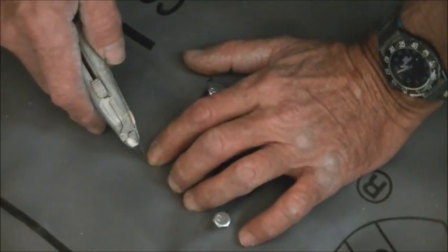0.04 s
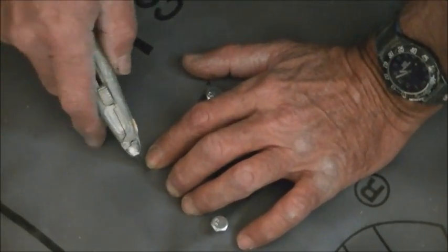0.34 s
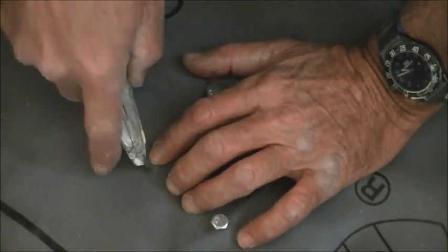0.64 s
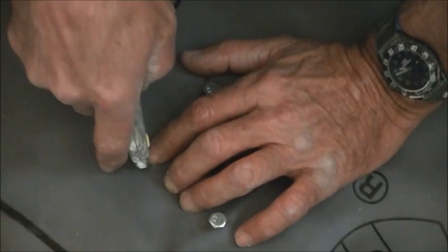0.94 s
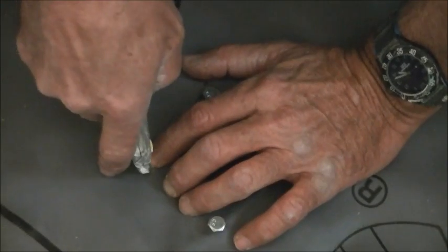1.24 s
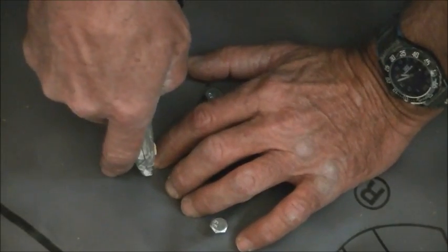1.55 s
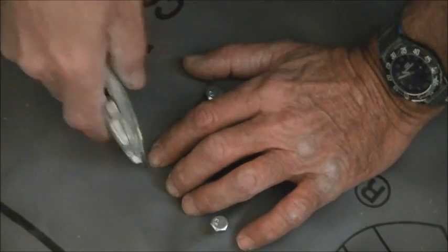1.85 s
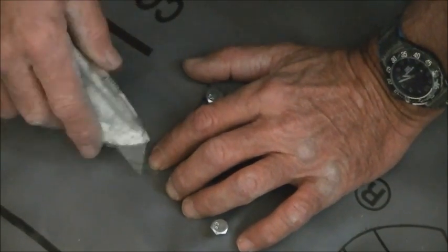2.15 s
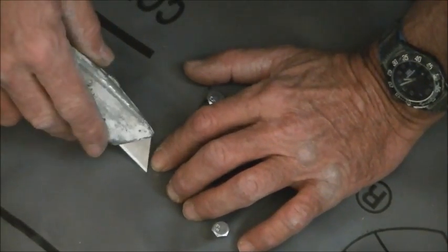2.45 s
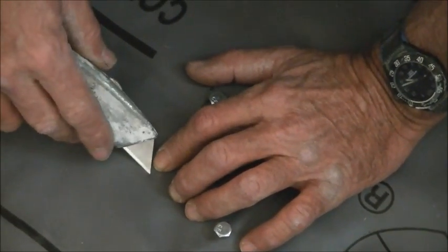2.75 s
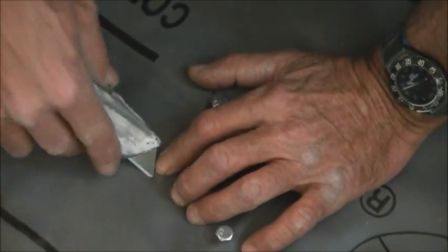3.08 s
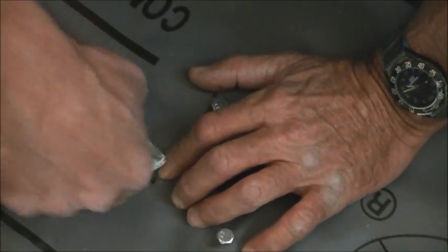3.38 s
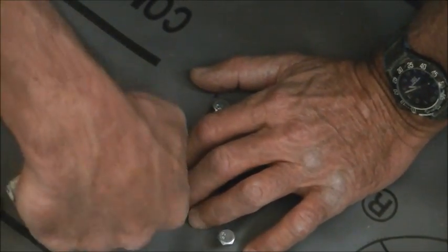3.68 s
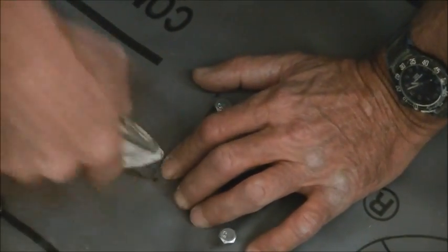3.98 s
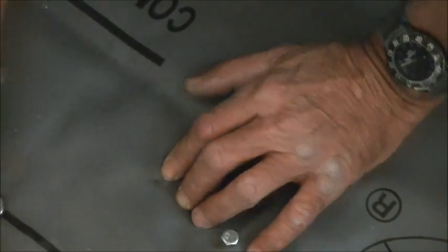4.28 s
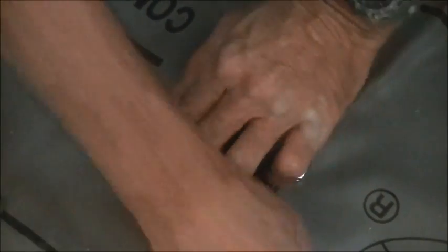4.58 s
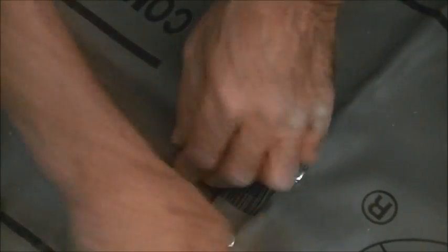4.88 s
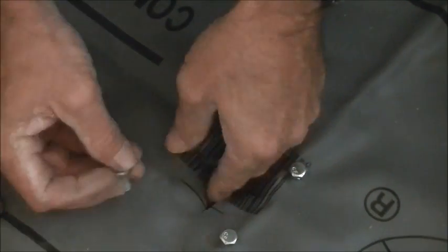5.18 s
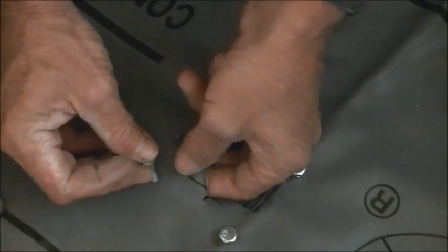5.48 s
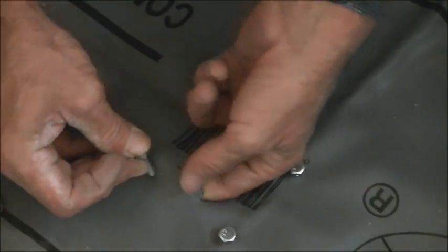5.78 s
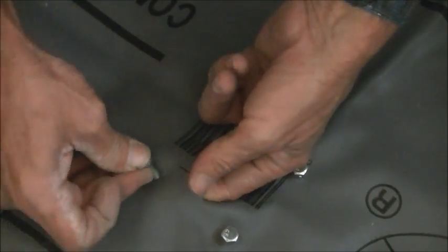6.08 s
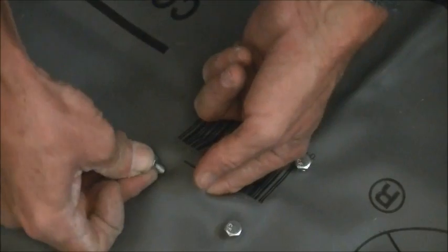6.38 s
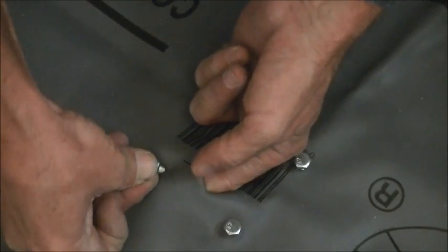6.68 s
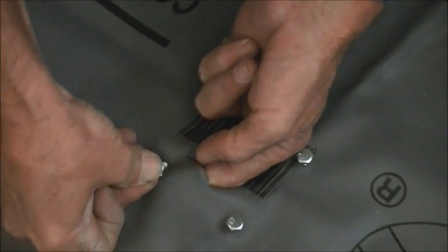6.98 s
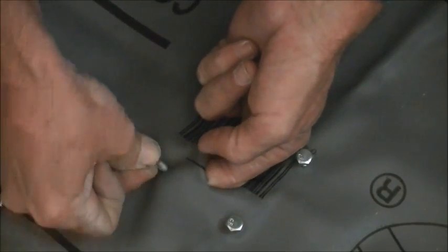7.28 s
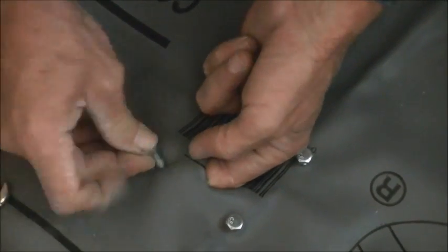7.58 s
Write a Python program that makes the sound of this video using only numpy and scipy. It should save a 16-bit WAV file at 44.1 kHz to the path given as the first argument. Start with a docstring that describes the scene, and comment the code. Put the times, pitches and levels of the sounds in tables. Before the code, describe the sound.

Heard close up in a small bathroom, scattered bright metal clicks and faint squeaks come from a utility knife being worked against a plastic liner. The loose blade chatters, then the knife hits the covered floor with one loud, low thud and settles. Hollow finger pats and hissing hand strokes over the plastic follow, with a few tiny bolt ticks and a soft knock. Low room noise and mains hum continue underneath.

```python
"""A metal utility knife, heard close up in a small bathroom, pricks a plastic floor liner.
Its blade slides out and rattles in the handle in bright, ringing clicks. The knife is then set down
hard: the covered floor thuds and booms, and the knife rocks to rest. Hands pat the liner, sweep it
with a hiss of tiny slips and fiddle with a bolt, over a quiet bed of room air and mains hum."""
import sys
import numpy as np
from scipy import signal
from scipy.fft import rfft
from scipy.io import wavfile
from scipy.ndimage import uniform_filter1d

SR = 44100
rng = np.random.default_rng(int(sys.argv[2]) if len(sys.argv) > 2 else 0)


def materialize(psi):
    """Save the field psi as 16-bit PCM at rate SR to the path in sys.argv[1].

    A 1-D psi becomes a single channel; in a 2-D psi each row is a channel.
    """
    bounded = np.clip(np.atleast_2d(psi).T, -1, 1)
    quanta = np.round(bounded * 32767).astype(np.int16)
    wavfile.write(sys.argv[1], SR, quanta)


N = 345611
HIT_TIME = np.arange(SR) / SR  # seconds since a hit
LANDING_S, TICK_T60_S = 4.388, .04  # when the knife lands; how fast its light ticks die

# Clicks of knife and bolt. Each row: start in seconds, level in dB, rattle t60 in seconds,
# midrange knock in dB, top-end edge in dB, handle resonance in Hz.
CLICKS = [(0.0607, -58, .05, 19, -3, 2730), (1.047, -51.5, 0.027, 12.5, -16, 1980),
          (1.744, -38, 0.031, 6, 1.5, 1940), (1.888, -49, 0.024, 15, 10, 2250),
          (1.8932, -37, 0.028, 0, 1, 1570), (1.991, -52.5, .02, 16, 6, 1510),
          (2.105, -60.5, .045, 17, 5, 1790), (2.1958, -52, .035, -2, 2, 3360),
          (2.46, -55, .04, 3.5, -11, 1920), (2.5761, -51, 0.11, 1.5, -4, 2440),
          (2.6613, -50.5, 0.028, 2.5, -7, 3300), (2.912, -51.5, 0.08, 4, -3, 3220),
          (2.9506, -43.5, .04, -4, 9, 2200), (3.2894, -57.5, .12, 9, -1, 1500),
          (3.3842, -53, 0.038, 13, 3, 3000), (3.9393, -53, .037, 22, -1, 1940),
          (3.966, -54, .066, 7, 3, 2730), (4.0096, -50.5, 0.08, 7, -1, 3240),
          (4.042, -44, 0.049, 7, 1, 3140), (4.0996, -54.5, .03, 13, -12, 4570),
          (4.3579, -45, 0.049, 17, -7, 1090), (4.3881, -26, 0.015, 8.5, 0, 3120),
          (4.5737, -48, .1, 6, -20, 2280), (5.379, -51.5, .06, -6, 7, 10500),
          (5.9676, -50, 0.036, 18, -24, 1630), (7.078, -57.5, 0.043, 26, -5, 1700)]
# The tone of a metal click. Each row: frequency in Hz, gain in dB.
METAL_EQ = [(60, -29), (150, 0), (400, -14), (1000, -1.5), (1450, -1.5), (3000, -2), (4400, 1), (8000, 1),
            (10000, -1), (13000, -4), (15500, -13)]
# The ring of the knife. Each row: pitch in Hz, relative level in dB, t60 in seconds.
KNIFE_MODES = [(1456, -23.5, 0.1), (1660, -28, 0.066), (2323, 7, 0.074), (3500, -12, 0.035),
               (4170, -2, 0.097), (4930, 9, 0.014), (5200, 18, .035), (6700, 3, 0.049), (7500, -4, 0.033),
               (7800, -15, .035), (8840, 11, 0.033), (9800, 1, 0.043), (10560, -18, .03), (13200, -13, .03)]
# Squeaks of blade, grip and liner. Each row: start and length in seconds, level in dB, pitch in Hz.
SQUEAKS = [(0.055, 0.11, -67, 2770), (1.199, 0.045, -57, 257), (1.892, 0.031, -53, 1520),
           (2.162, 0.19, -68.5, 2630), (3.65, 0.19, -71, 3400), (3.97, 0.1, -63, 3430),
           (4.16, 0.084, -63, 860), (4.507, 0.12, -55.5, 2310), (4.7, 0.034, -45.5, 1030),
           (6.269, 0.14, -65.5, 324)]
# Blows on the covered floor. Each row: start in seconds, level in dB, contact cut-off in Hz.
THUDS = [(1.7445, -51, 700), (3.465, -56.5, 800), (4.046, -54, 150), (4.368, -43, 650),
         (4.387, -27.5, 11000), (4.3884, -18, 2500), (4.3911, -25.5, 1190), (5.969, -54, 1000),
         (7.367, -48, 1000), (7.378, -46.5, 800)]
# The tone of a blow. Each row: frequency in Hz, gain in dB.
BLOW_EQ = [(30, -43), (60, -36), (120, -3.5), (195, 3), (290, 3.5), (480, -6.5), (750, -3.5), (1150, -2.5),
           (1450, -22), (1900, -11), (3100, -33), (4400, -12), (7000, -16), (15500, -31)]
# The ring of the floor. Each row: pitch in Hz, relative level in dB, t60 in seconds.
FLOOR_MODES = [(77, -11, 0.95), (184, -29, 0.31), (239.4, 4, 0.42), (276, -2, 0.045), (320, -11, 0.2),
               (421, 7, 0.27), (521, 6.5, .35), (583, 2.5, 0.2), (653, -14, 0.36), (670, -19, 0.32),
               (766, -8, 0.25), (940, -13, 0.46), (1050, -11, 0.451), (1170, -10, .22), (1210, -14, .2),
               (2255, 3, 0.33), (2800, -18, .3), (3277, -20, 0.31), (3655, -14, .3)]
# Finger pats. Each row: start in seconds, level in dB, treble slap in dB, t60 in seconds.
PATS = [(4.711, -45.5, 11, 0.03), (4.967, -45.5, -4, 0.12), (5.174, -47.5, -15.5, 0.041),
        (5.186, -39.5, 4, 0.084), (5.466, -48, -11, 0.072), (5.678, -54, 2, 0.02)]
# The hollow tone of a pat. Each row: frequency in Hz, gain in dB.
PAT_EQ = [(40, -29), (120, 0), (190, -12), (250, -8), (325, 14), (420, -5.5), (600, -11), (900, 1),
          (1300, -9), (1900, -5.5), (3500, -17), (8000, -18.5), (15500, -36)]
# Hand sweeps. Each row: loudest moment and length in seconds, level at that moment in dB.
STROKES = [(3.452, .26, -65), (4.198, 0.48, -58.5), (4.359, 0.082, -50.5), (4.519, .32, -53),
           (4.764, .36, -48), (5.211, 0.55, -52.5), (5.46, .36, -58.5), (5.654, .2, -55),
           (6.067, 0.21, -62), (6.772, 0.45, -59.5), (7.439, .2, -63), (7.599, .6, -61.5)]
# The tone of skin on plastic. Each row: frequency in Hz, gain in dB.
RUB_EQ = [(80, -39), (300, -5), (700, 1), (1100, -3.5), (2200, -1.5), (4000, -8.5), (7500, -7.5),
          (11000, -15), (15500, -25)]
# Soft, close bumps. Each row: start in seconds, level in dB.
BUMPS = [(.357, -48.5), (1.9916, -49), (7.3692, -51)]
# The dull tone of a bump. Each row: frequency in Hz, gain in dB.
BUMP_EQ = [(20, -19), (60, -2), (200, -2.5), (450, -10.5), (1000, -27), (3000, -32), (10000, -59)]
# The bassy tone of the flutter. Each row: frequency in Hz, gain in dB.
FLUTTER_EQ = [(25, -48), (55, 0.5), (100, 6.5), (160, 0), (260, -4), (400, -25), (900, -37.5)]
# The tone of the room air. Each row: frequency in Hz, gain in dB.
AIR_EQ = [(20, -50), (40, -23), (60, -3), (100, -7.5), (130, 0), (175, -3), (250, -3), (420, -7.5),
          (1300, -14.5), (2800, -15.5), (3900, -19.5), (7600, -21), (13800, -28), (15800, -31.5)]
# Mains hum. Each row: pitch in Hz, rms level in dB.
HUM = [(120, -75), (180, -69), (241, -71)]
# The bathroom's decay. Each row: frequency in Hz, t60 in seconds.
ROOM_T60 = [(100, 1), (300, 0.41), (1000, 0.35), (3000, 0.44), (8000, 0.37), (15000, 0.18)]
# Early wall echoes. Each row: delay in seconds, relative level in dB.
WALL_ECHOES = [(.0095, -20.5), (0.0184, -12), (0.022, -21), (.039, -20.5)]


def click(db, t60, knock_db, edge_db, handle_hz, modes_db=-13, rise_s=.00079):
    """Steel snaps against the handle: a dense burst, resonances of grip and blade, and the knife's ring."""
    burst = colour(rattle(t60), METAL_EQ)
    blade_hz = 7700 - 45 * (db + 47)  # a harder knock moves more of the blade, which rings lower
    handle = amp(6) * resonate(burst, handle_hz, q=7)
    blade = amp(1) * resonate(burst, blade_hz, q=4)
    ringing = amp(modes_db) * struck(ring(KNIFE_MODES, spread_db=-8.5))
    snap = struck(burst + handle + blade) + ringing
    attack = 1 - np.exp(-HIT_TIME / rise_s)
    tilt = [(300, 0), (1500, knock_db), (3200, knock_db), (5500, 0), (9000, 0), (12000, edge_db)]
    return amp(db) * struck(colour(snap * attack, tilt))


def clicks():
    """The distinct clicks of slider, blade and bolt."""
    out = np.zeros(N)
    for start, *voicing in CLICKS:
        add(out, start, click(*voicing))
    return out


def chatter(start=3.653, count=6, first_db=-58, fall_db=2.5, gap_s=.065, hurry=1.15):
    """The loose blade chatters as the fist tightens: each thin tick comes sooner and softer."""
    out = np.zeros(N)
    for k in range(count):
        tick = click(first_db - fall_db * k, TICK_T60_S, knock_db=-17, edge_db=-2, handle_hz=3450)
        add(out, start, tick)
        start += gap_s / (k + 1) ** hurry
    return out


def ticks(count=7, db=-64, spread_db=7, spread_octaves=.25):
    """The knife ticks faintly at chance moments while it is in the hand."""
    out = np.zeros(N)
    for when, softness, grip in rng.uniform(-1, 1, (count, 3)):
        handle_hz = 2320 * 2 ** (spread_octaves * grip)
        tick = click(db - spread_db * softness, TICK_T60_S, knock_db=15, edge_db=2, handle_hz=handle_hz)
        add(out, LANDING_S * (when + 1) / 2, tick)
    return out


def squeaks(slips_per_s=900, q=5.9):
    """Blade, grip and liner squeak and rasp: stick-slip ticks keep one resonance sounding."""
    out = np.zeros(N)
    for start, length, db, hz in SQUEAKS:
        slips = rng.standard_normal(SR) * (rng.random(SR) < slips_per_s / SR)
        pressure = np.sqrt(np.sin(np.pi * np.minimum(HIT_TIME / length, 1)).clip(0))
        tone = resonate(resonate(slips, hz, q / 2), hz, q)
        add(out, start, amp(db) * pressure * unit(tone))
    return out


def thuds(clatter_db=-4, clatter_cut_hz=500, floor_db=-16, bloom_s=.0058):
    """A sharp push and a short clatter ring the floor; a softer contact loses treble."""
    out = np.zeros(N)
    low_cut = signal.butter(2, clatter_cut_hz, "high", fs=SR)
    bloom = 1 - np.exp(-HIT_TIME / bloom_s)
    for start, db, cut_hz in THUDS + rocks():
        t60 = .041 * .5 ** ((db + 54) / 10)  # every 10 dB harder halves the clatter's length
        clatter = signal.lfilter(*low_cut, rattle(t60))
        push = -struck(signal.unit_impulse(SR)) + amp(clatter_db) * struck(clatter)
        ringing = amp(floor_db) * struck(ring(FLOOR_MODES, spread_db=5)) * bloom
        blow = struck(colour(push, BLOW_EQ)) + ringing
        contact = signal.butter(2, cut_hz, fs=SR)
        add(out, start, amp(db) * struck(signal.lfilter(*contact, blow)))
    return out


def rocks(count=3, gap_s=.09, shrink=.82, first_db=-46, fall_db=4, cut_hz=600):
    """The knife rocks to rest: extra rows for THUDS, ever closer together and fading ever faster."""
    starts = LANDING_S + np.cumsum(gap_s * shrink ** np.arange(count))
    return [(start, first_db - fall_db * k ** 2, cut_hz) for k, start in enumerate(starts)]


def booms(floor_hz=142, swell_s=.021, thud_send_db=-10, rock_send_db=16, pat_send_db=-13):
    """Under every blow, rock and pat, a low floor mode swells and dies within a few cycles."""
    out = np.zeros(N)
    swell = (HIT_TIME / swell_s * np.exp(1 - HIT_TIME / swell_s)) ** 2
    boom = swell * np.sin(2 * np.pi * floor_hz * HIT_TIME)
    for touches, send_db in (THUDS, thud_send_db), (rocks(), rock_send_db), (PATS, pat_send_db):
        for start, db, *_ in touches:
            add(out, start, amp(db + send_db) * boom)
    return out


def pats(snap_db=-10):
    """Fingers press the liner onto the floor: a hollow puff with a plastic slap on top."""
    out = np.zeros(N)
    for start, db, slap_db, t60 in PATS:
        touch = struck(rattle(t60)) + amp(snap_db) * struck(signal.unit_impulse(SR))
        slap_shelf = [(400, 0), (1500, slap_db)]
        add(out, start, amp(db) * struck(colour(touch, PAT_EQ, slap_shelf)))
    return out


def strokes(slips_per_s=5000, rise_share=.47, ends_db=-16, touch_s=.012):
    """A hiss of tiny slips swells and fades as a hand slides over the plastic."""
    out = np.zeros(N)
    for peak_s, length, db in STROKES:
        rise_s = length * rise_share
        sizes = np.minimum(rng.exponential(1, SR), 5) * rng.standard_normal(SR)
        slips = sizes * (rng.random(SR) < slips_per_s / SR)
        squeak_db = 4 - .42 * (db + 57)  # light strokes squeak more near 1 kHz
        hiss = unit(colour(slips, RUB_EQ, [(600, 0), (1050, squeak_db), (2500, 0)]))
        speed = amp(np.interp(HIT_TIME, [0, rise_s, length], [ends_db, 0, ends_db]))
        touching = np.clip(np.minimum(HIT_TIME, length - HIT_TIME) / touch_s, 0, 1)
        add(out, peak_s - rise_s, amp(db) * hiss * speed * touching)
    return out


def bumps():
    """Single dull pushes, close and dry, with no ring."""
    out = np.zeros(N)
    bump = struck(colour(-signal.unit_impulse(SR), BUMP_EQ))
    for start, db in BUMPS:
        add(out, start, amp(db) * bump)
    return out


def flutter(rate_hz=30, jitter=.3, noise_db=-2, press_s=.31, lift_s=1.6, pressed_db=-61.5, rest_db=-81):
    """Uneven low pulses that swell while the knife tip is pressed in."""
    t = np.arange(N) / SR
    cycles = np.cumsum(rate_hz * (1 + jitter * wander(N, 2000))) / SR
    pulses = unit(np.diff(np.floor(cycles), prepend=0)) + amp(noise_db) * rng.standard_normal(N)
    attack = np.clip((t - press_s) / .19, 0, 1)
    release = np.exp(-np.maximum(t - lift_s, 0) / .25)
    level = np.maximum(amp(pressed_db) * attack * release, amp(rest_db))
    return level * unit(colour(pulses - pulses.mean(), FLUTTER_EQ))


def room_tone(air_db=-59.5, waver_rad=.51):
    """A steady bed of hiss and rumble with a wavering mains hum."""
    t = np.arange(N) / SR
    air_gain = amp(curve(AIR_EQ, np.fft.rfftfreq(N, 1 / SR)))
    air = np.fft.irfft(rfft(rng.standard_normal(N)) * air_gain, N)
    hum = np.zeros(N)
    for hz, db in HUM:
        drift = uniform_filter1d(wander(N, 4000), size=400)
        hum += amp(db) * unit(np.sin(2 * np.pi * hz * t + waver_rad * drift))
    return amp(air_db) * unit(air) + hum


def bathroom(x, tail_db, echo_trim_db, build_s=.0012):
    """Adds a few wall echoes and a diffuse tail in which each band dies at its own speed."""
    hz, t, bands = signal.stft(rng.standard_normal(SR), SR, nperseg=256)
    bands *= fade(t, curve(ROOM_T60, hz)[:, None])
    tail = signal.istft(bands, SR, nperseg=256)[1][:SR]
    tail *= 1 - np.exp(-(HIT_TIME / build_s) ** 2)
    response = amp(tail_db) * tail / np.linalg.norm(tail)
    for delay, db in WALL_ECHOES:
        add(response, delay, amp([db + echo_trim_db]))
    return x + signal.fftconvolve(x, response)[:N]


def rattle(t60, clump_db=3):
    """A dying burst of dense micro-contacts that come in clumps."""
    clumps = amp(clump_db * wander(SR, 70))
    return rng.standard_normal(SR) * clumps * fade(HIT_TIME, t60)


def ring(modes, spread_db):
    """Decaying modes; each blow excites them differently."""
    return sum(amp(db + spread_db * rng.normal()) * fade(HIT_TIME, t60)
               * np.sin(2 * np.pi * hz * HIT_TIME) for hz, db, t60 in modes)


def resonate(x, hz, q):
    """One resonance with unity gain at its peak."""
    return signal.lfilter(*signal.iirpeak(hz, q, fs=SR), x)


def colour(x, *eqs, size=4096):
    """Stacks EQ curves in one minimum-phase filter, so nothing rings ahead of a hit."""
    hz = abs(np.fft.fftfreq(size, 1 / SR))
    log_gain = np.log(amp(sum(curve(eq, hz) for eq in eqs)))
    spectrum = np.exp(np.conj(signal.hilbert(log_gain)))
    taps = np.fft.ifft(spectrum).real[:size // 2]
    return signal.oaconvolve(x, taps)[:len(x)]


def curve(points, hz):
    """Reads a table on a log-frequency axis."""
    point_hz, values = np.transpose(points)
    return np.interp(np.log(hz + 1), np.log(point_hz + 1), values)


def wander(samples, smooth_samples):
    """Smoothed random movement at rms 1."""
    return unit(uniform_filter1d(rng.standard_normal(samples), size=smooth_samples))


def fade(t, t60):
    """Exponential decay that loses 60 dB in t60 seconds."""
    return np.exp(-np.log(1000) * t / np.maximum(t60, 1e-3))


def amp(db):
    """Decibels to gain."""
    return 10 ** (np.asarray(db) / 20)


def unit(x):
    """Scales to rms 1."""
    return x / np.sqrt(np.mean(x ** 2) + 1e-20)


def struck(x):
    """Scales a hit so its first 10 ms have rms 1."""
    return x / np.sqrt(np.mean(x[:SR // 100] ** 2) + 1e-20)


def add(mix, start, sound):
    """Mixes a sound in at a start time in seconds."""
    part = mix[max(round(start * SR), 0):][:len(sound)]
    part += sound[:len(part)]


def scene():
    """Knife, floor and hands in the bathroom's reverb; the low layers and room tone stay dry. Mono."""
    knife = bathroom(clicks() + chatter() + ticks() + squeaks(), tail_db=-5, echo_trim_db=-2)
    floor = bathroom(thuds(), tail_db=-6.5, echo_trim_db=-1)
    hands = bathroom(pats() + strokes(), tail_db=-4.5, echo_trim_db=-8)
    return (knife + floor + hands + booms() + bumps() + flutter() + room_tone())[None]


def record(dry, ceiling=.5, low_cut_hz=38, high_cut_hz=15900):
    """Soft clipping rounds off the hardest blow; then a low cut and a steep high cut."""
    clipped = ceiling * np.tanh(dry / ceiling)
    trimmed = signal.lfilter(*signal.butter(2, low_cut_hz, "high", fs=SR), clipped)
    high_cut = signal.firwin(511, high_cut_hz, window=("kaiser", 9), fs=SR)
    return signal.oaconvolve(trimmed, high_cut[None], "same")


dry = scene()
out = record(dry)
materialize(out)
```